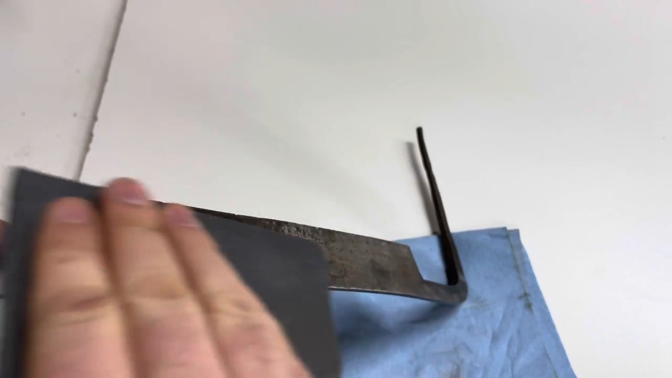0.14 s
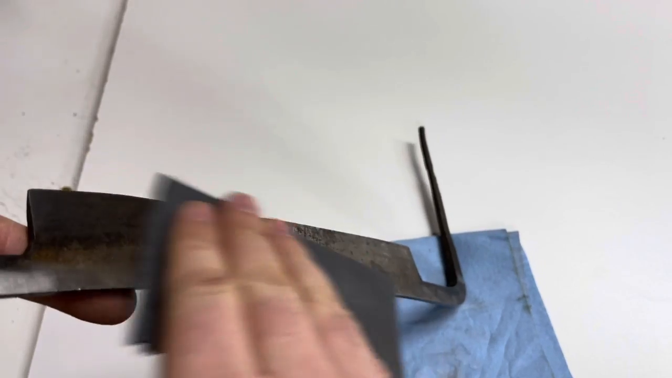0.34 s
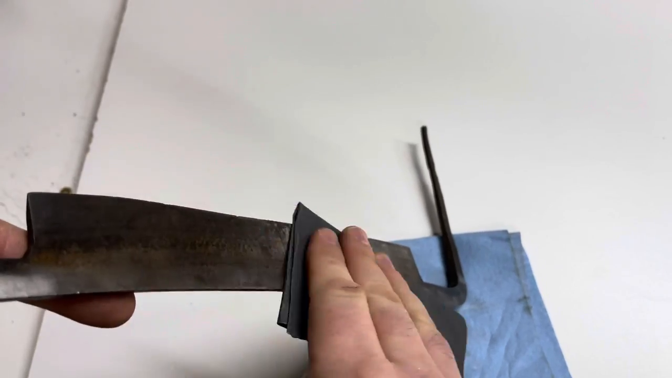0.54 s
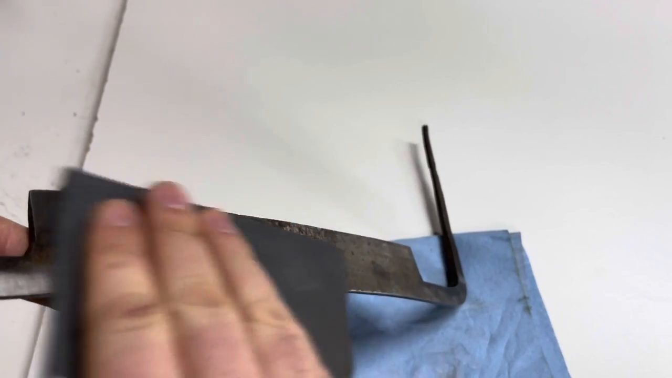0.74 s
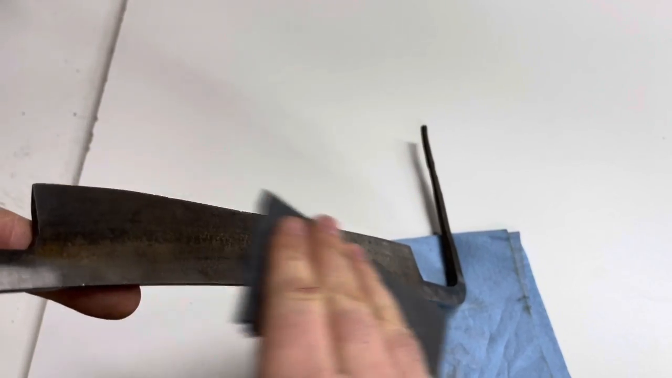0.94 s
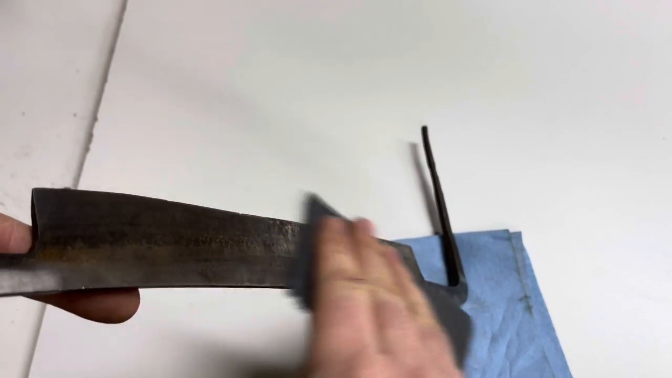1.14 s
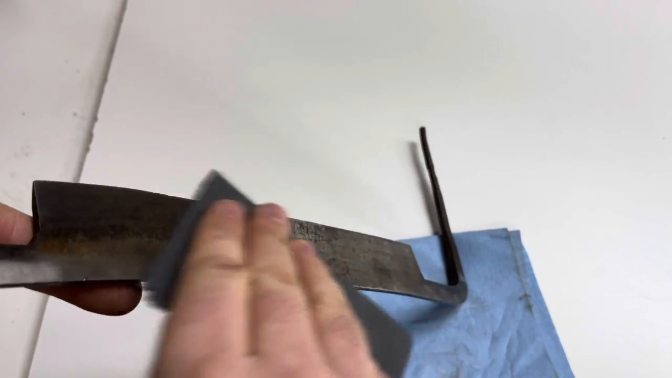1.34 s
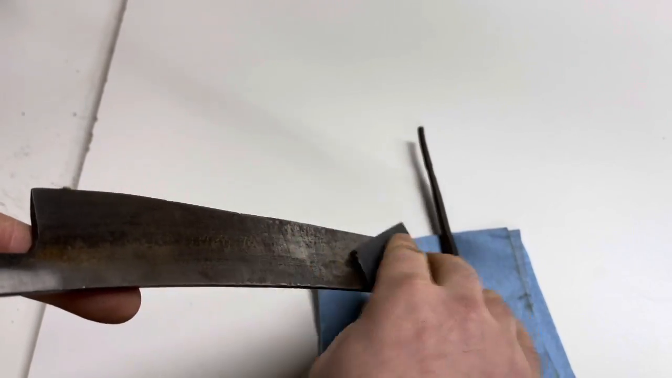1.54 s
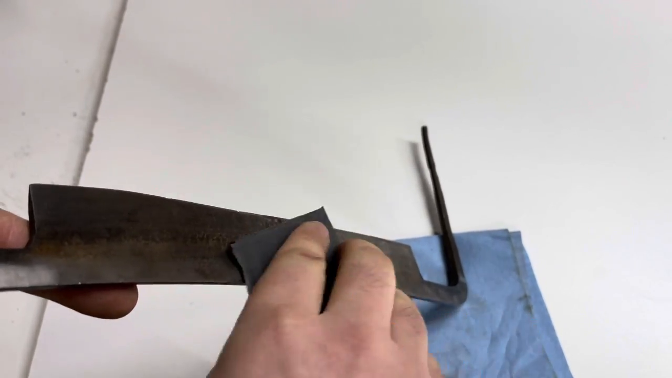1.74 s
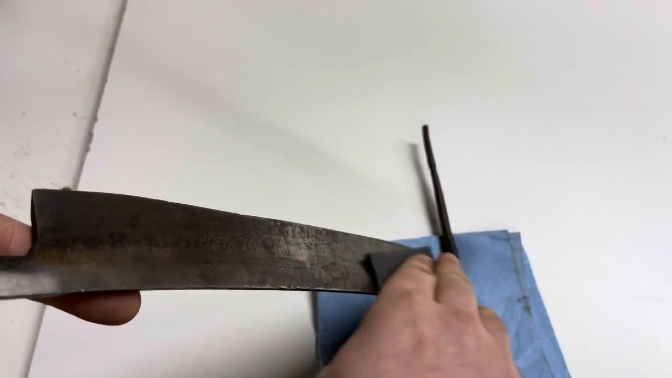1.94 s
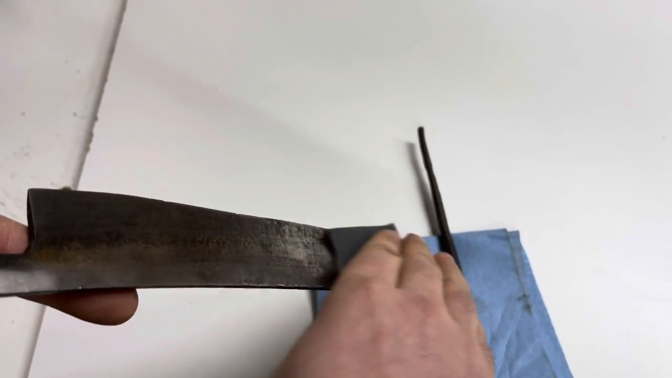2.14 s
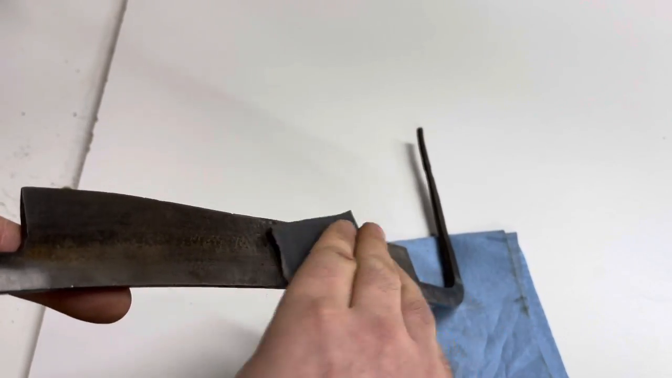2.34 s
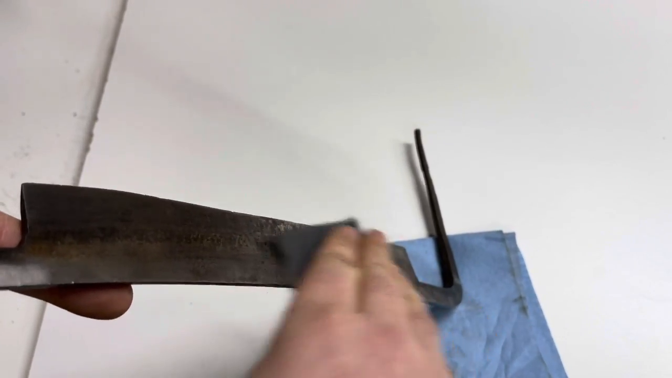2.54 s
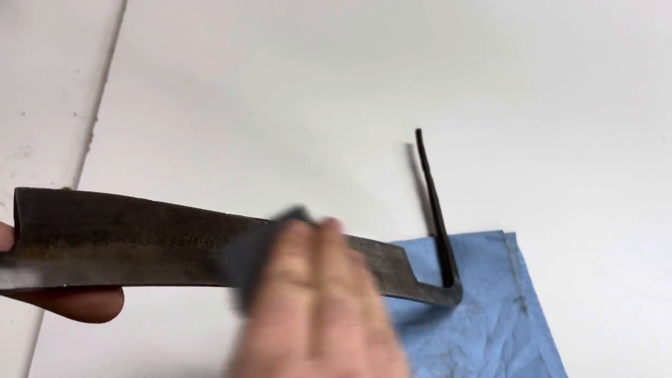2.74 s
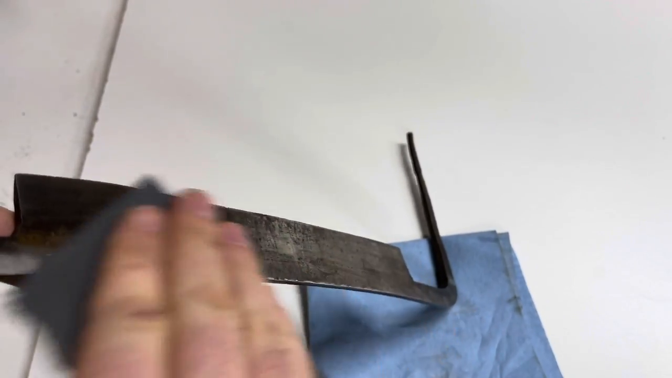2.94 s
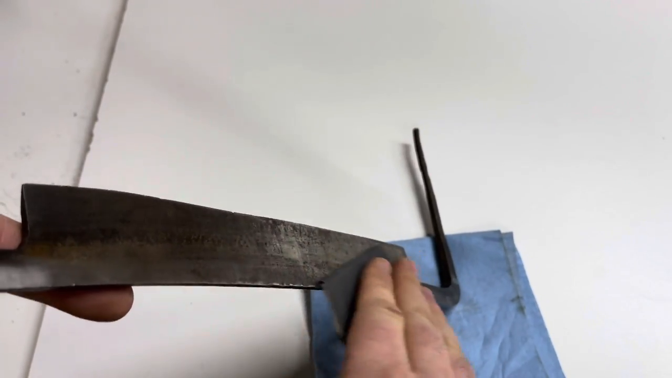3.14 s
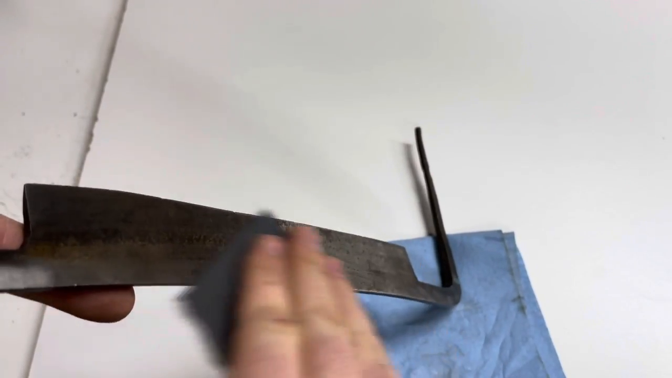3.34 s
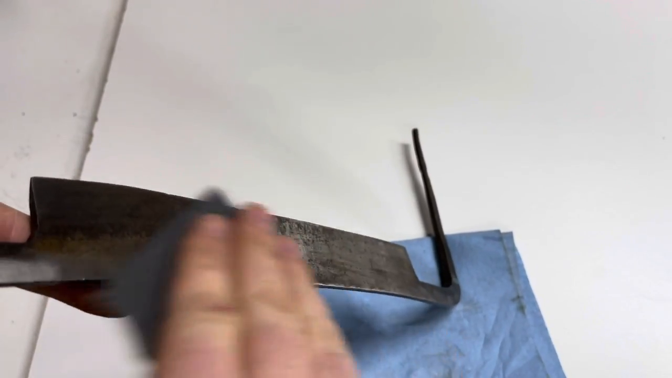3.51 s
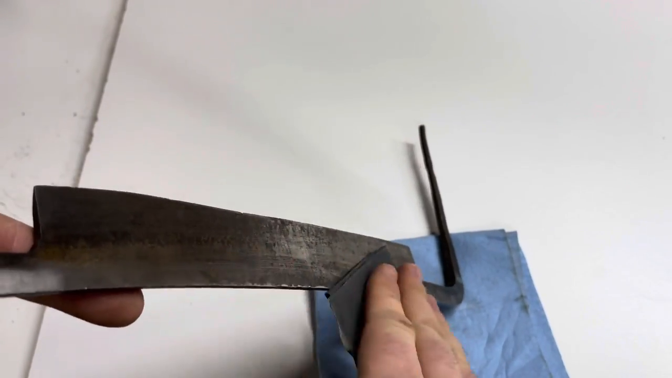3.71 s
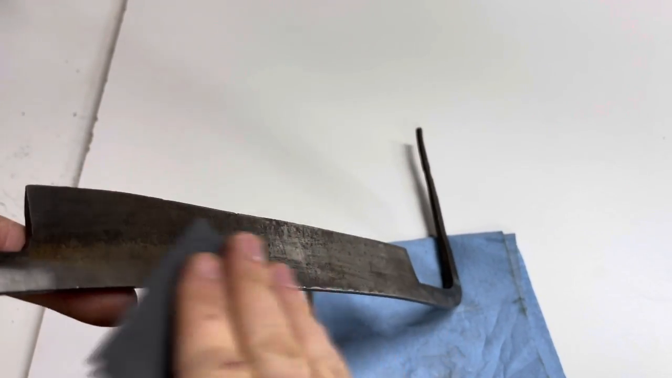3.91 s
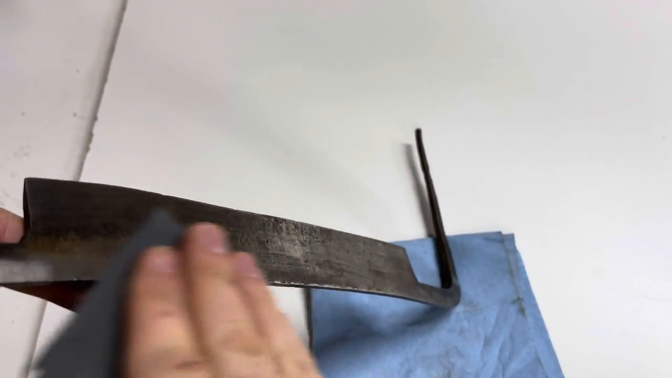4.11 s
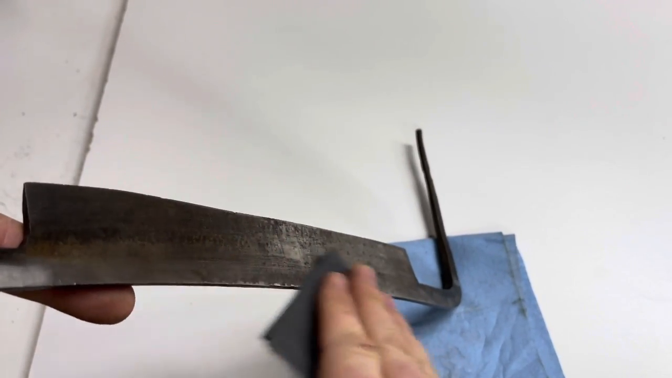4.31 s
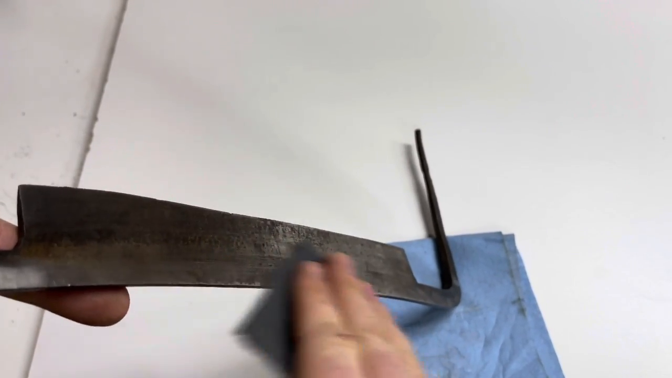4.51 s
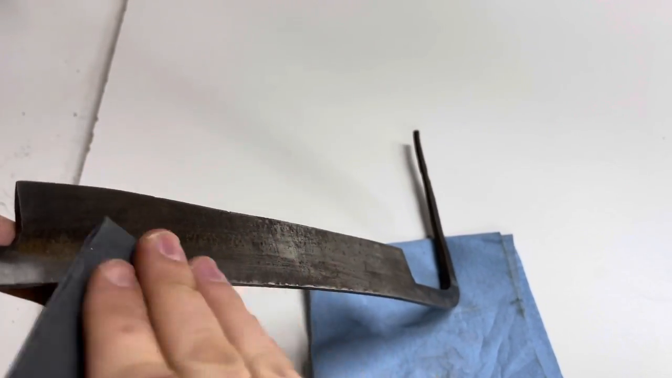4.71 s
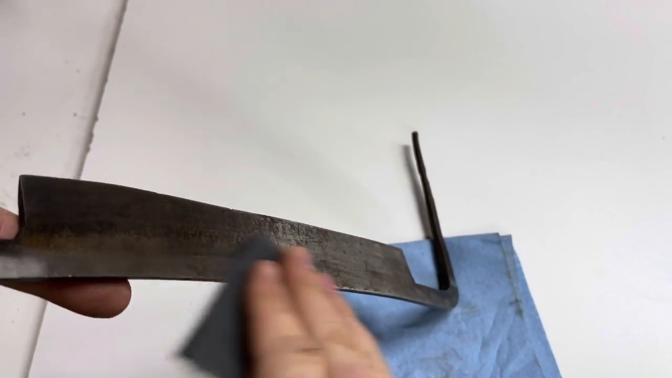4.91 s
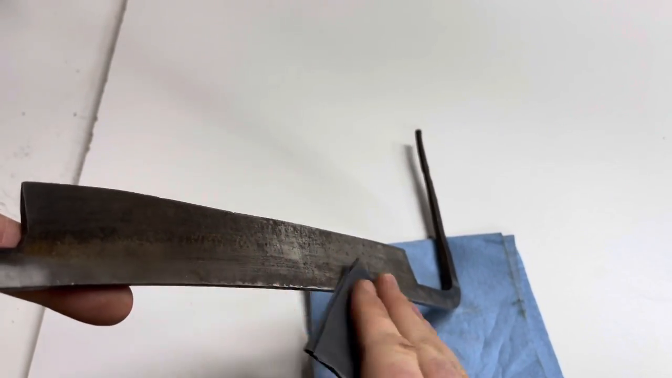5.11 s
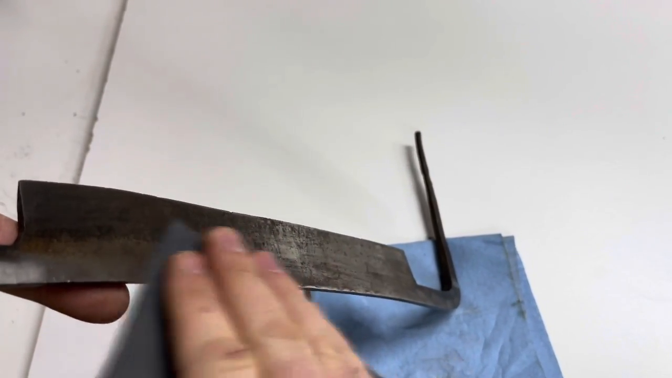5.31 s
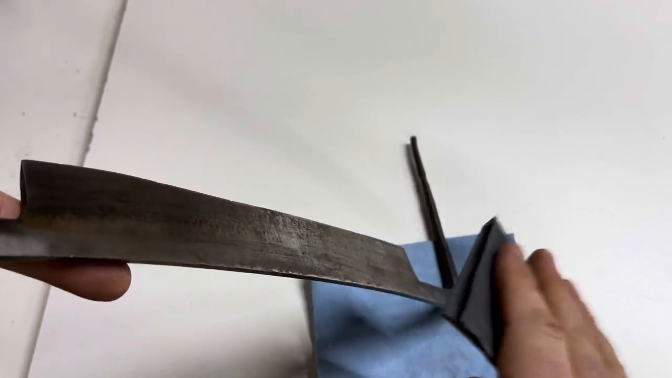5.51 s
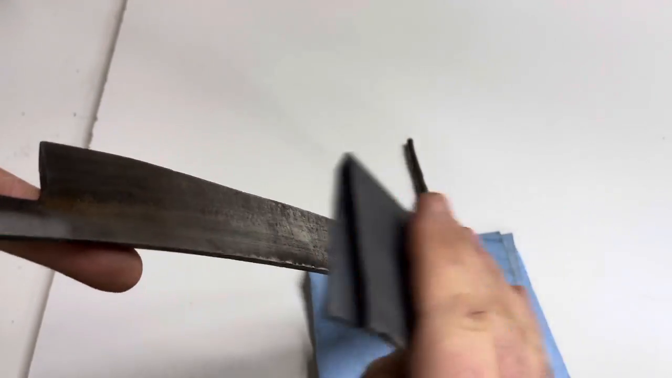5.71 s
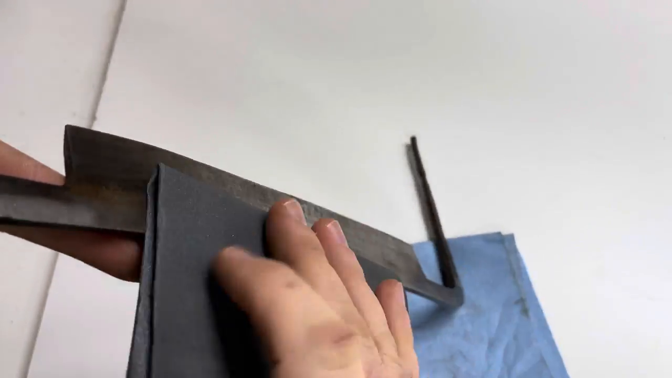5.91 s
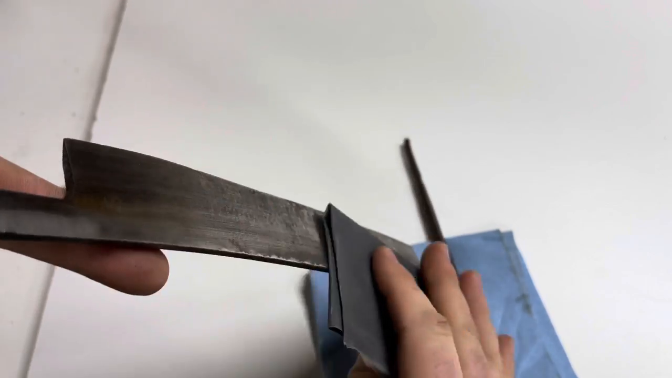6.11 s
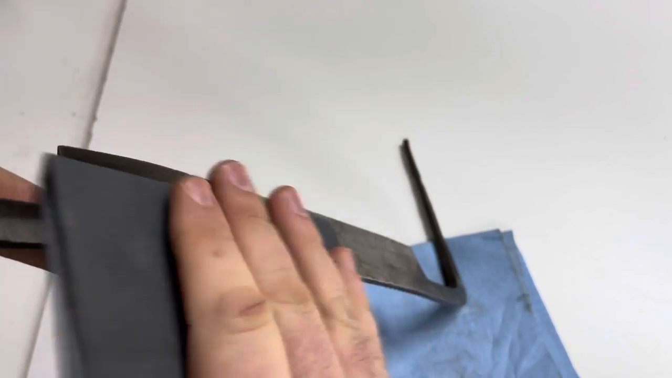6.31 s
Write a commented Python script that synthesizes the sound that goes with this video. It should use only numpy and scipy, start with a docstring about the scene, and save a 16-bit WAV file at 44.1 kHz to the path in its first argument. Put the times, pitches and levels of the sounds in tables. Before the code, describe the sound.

Fast hand sanding of steel: bright, gritty, alternating rasps with tiny gaps at each turn, heard close in stereo. Strokes begin loud, ease slightly, and continue steadily with occasional sharp scratches and low metallic flexing. After more than five seconds they stop for half a second of light brushing and thuds, then sanding resumes until the cut-off. A quiet machine hum and room air sit beneath.

```python
"""Sandpaper is rubbed to and fro along a rusty steel blade on a bench, close to a two-port microphone. From the
start a machine hums, shaped noise hisses stroke by stroke under the hand's gliding hollow resonance, noise
bursts snag, and noise through flexing modes makes the blade rumble; knocks ring the bench. At 5.45 s the paper
lifts; only light touches and knocks sound until the strokes resume at 5.97 s, the hum swelling, and run to the
end."""
import sys
import numpy as np
from scipy import signal
from scipy.fft import rfft, irfft, next_fast_len
from scipy.io import wavfile
from scipy.ndimage import uniform_filter1d, map_coordinates

SR = 44100
rng = np.random.default_rng(int(sys.argv[2]) if len(sys.argv) > 2 else 0)


def put_to_file(sound):
    """Save the sound as 16-bit audio at rate SR, in the file named by the first command-line argument."""
    columns = np.atleast_2d(sound).T  # one column per channel
    safe = np.clip(columns, -1, 1)
    whole_steps = np.round(safe * 32767)
    wavfile.write(sys.argv[1], SR, whole_steps.astype(np.int16))


N = 280035


def amp(db):
    """Gain of a level in dB."""
    return 10 ** (np.asarray(db) / 20)


def unit(x):
    """Scaled to rms 1."""
    return x / np.sqrt(np.mean(x ** 2) + 1e-20)


def at(t, curve):
    """A per-sample curve read at times t in seconds."""
    return np.interp(t, np.arange(N) / SR, curve)


def curves(rows, t=None):
    """Each column after the time, interpolated at every sample or at times t."""
    s, *cols = np.transpose(rows)
    when = np.arange(N) / SR if t is None else t
    return [np.interp(when, s, c) for c in cols]


def wobble(rate_hz):
    """A smooth random curve, rate_hz knots a second."""
    knots = rng.standard_normal(int(N * rate_hz / SR) + 4)
    return map_coordinates(knots, [np.arange(N) * rate_hz / SR])


def patches(shape, size):
    """A random field over frequency and time, smooth over size cells."""
    field = rng.standard_normal(shape)
    field = uniform_filter1d(field, size[0], axis=0)
    return unit(uniform_filter1d(field, size[1], axis=1))


def filtered(x, response):
    """x times a complex response of frequency."""
    m = next_fast_len(N + SR // 2)
    return irfft(rfft(x, m) * response(np.fft.rfftfreq(m, 1 / SR)), m)[..., :N]


def along(points, hz):
    """Each column after the frequency, interpolated on a log axis."""
    f, *v = np.transpose(points)
    return np.array([np.interp(np.log(hz + 1), np.log(f + 1), c) for c in v])


def resonance(f, hz, width_hz):
    """One causal resonance of top gain 1."""
    return 1j * f * width_hz / (hz * hz - f * f + 1j * f * width_hz)


# Each row: frequency in Hz, left-right likeness from 0 to 1.
PORT_LIKENESS = [(25, .7), (100, .85), (600, .25), (1050, .65), (1550, .6), (2200, .25), (2800, .15),
                 (4000, .3), (5000, .15), (6200, .4), (6900, .1), (8300, .55), (8750, .85), (9200, .8),
                 (10000, .99), (10400, .995), (11400, .8), (11900, .99), (12500, .97), (13200, .3),
                 (14300, .4), (15000, .99)]
# Port resonances differ. Each row: frequency in Hz, lead of the right port in rad.
RIGHT_LEAD = [(100, .3), (300, 1), (800, -1.1), (1450, -.1), (1850, 1), (2500, 3.3), (3400, 2.3),
              (4000, -1), (5200, -2.5), (6000, 0), (7100, -1.7), (8100, 0), (8750, .2), (9300, 1.4),
              (9730, 2.6), (10080, 3.05), (10330, 3.25), (10800, 4.1), (11300, 5.1), (11800, 2 * np.pi)]


def ports(pair):
    """Two unrelated signals become the partly alike left and right of the microphone."""
    m = next_fast_len(N + 8192)
    hz = np.fft.rfftfreq(m, 1 / SR)
    left, other = rfft(pair, m)
    alike = np.clip(along(PORT_LIKENESS, hz)[0], 0, 1)
    shared = alike * left * np.exp(1j * along(RIGHT_LEAD, hz)[0])
    right = shared + np.sqrt(1 - alike ** 2) * other
    return irfft(np.array([left, right]), m)[:, :N]


# Machine hum before its wavering. Each row: time in s, fundamental in dB, octave in dB.
HUM_LEVELS = [(0, -62, -69), (2.2, -60.5, -72), (2.7, -64, -72), (3.8, -57.5, -68), (5.4, -58.5, -67),
              (5.95, -52, -55.5), (6.05, -56, -47), (6.35, -55, -49)]
# Room air spectrum. Each row: frequency in Hz, relative level in dB.
AIR_SPECTRUM = [(25, -46), (45, 7), (70, 2), (200, -9), (400, -6), (1500, -23.5), (3000, -13.5),
                (8000, -41), (10400, -37), (11400, -44), (12200, -50), (16000, -58)]
HUM_HZ, HUM_WAVERS_DB = 69.8, 1.5


def workshop():
    """A wavering machine hum of three harmonics over steady room air."""
    low_db, octave_db = curves(HUM_LEVELS)
    phase = 2 * np.pi * np.cumsum(HUM_HZ + 0.46 * wobble(2.99)) / SR
    hum = amp(low_db + HUM_WAVERS_DB * wobble(2.42)) * np.sin(phase)
    hum += amp(octave_db + HUM_WAVERS_DB * wobble(2.3)) * np.sin(2 * phase)
    hum += amp(-69.5) * np.sin(3 * phase)
    air = filtered(ports(rng.standard_normal((2, N))), lambda f: amp(along(AIR_SPECTRUM, f)))
    return hum + amp(-58.0) * unit(air) * amp([[1.2], [-1.2]])  # left louder than right


# Blade or hand meeting the bench. Each row: start in s, relative thud in dB, relative click in dB.
BENCH_KNOCKS = [(0.762, -41, -51), (1.204, -54, -24), (2.082, -66, -27.5), (3.347, -48, -45),
                (3.957, -55, -47), (5.574, -51, -36), (5.812, -30.5, -36.5), (6.029, -33, -36),
                (6.17, -41, -50), (6.203, -38, -50), (6.302, -36, -31.5)]
# Bench modes. Each row: frequency in Hz, relative level in dB, t60 in s.
BENCH_MODES = [(76.4, -8, .12), (111, 4.5, 0.066), (152, 10.5, 0.042), (264, 12, 0.033), (321, 5.5, 0.06),
               (406, 0, 0.091), (540, 9, 0.03)]
KNOCK_SCATTER_DB = 2.5  # from mode to mode and knock to knock


def knocks():
    """Each knock rings the bench modes as a thud and clicks dully on the steel."""
    thud, click = np.zeros((2, N + SR)), np.zeros((2, N + SR))
    t = np.arange(SR // 4) / SR
    for s, thud_db, click_db in BENCH_KNOCKS:
        here = slice(round(s * SR), round(s * SR) + len(t))
        ring = 0
        for hz, db, t60 in BENCH_MODES:
            decay = amp(db + rng.normal(0, KNOCK_SCATTER_DB) - 60 * t / t60)
            ring = ring + decay * np.sin(2 * np.pi * hz * t)
        thud[:, here] += amp(thud_db - 7.5) * ring * (1 - np.exp(-t / 0.0048))
        click[:, here] += amp(click_db - 60 * t / 0.067) * rng.standard_normal((2, len(t)))
    return thud[:, :N] + filtered(ports(click[:, :N]), lambda f: 2 * resonance(f, 1620, 870))


# Pushes and pulls in turn, each up to the next row. Each row: start in s, relative early level in dB,
# relative late level in dB, hollow under the hand at the start in Hz.
STROKE_ROWS = [(-0.05, -26.5, -23.5, 1560), (0.127, -23.5, -23.5, 1270), (0.275, -25, -25.5, 1770),
               (0.425, -25, -23.5, 1230), (0.572, -25.5, -26, 1780), (0.715, -25, -23.5, 1290),
               (0.882, -25.5, -26.5, 1790), (1.05, -27, -23.5, 1300), (1.218, -28, -26.5, 1730),
               (1.402, -27, -30.5, 1440), (1.601, -28.5, -29, 1820), (1.767, -28.5, -30.5, 1200),
               (1.926, -28.5, -30.5, 1980), (2.07, -29.5, -26, 1200), (2.21, -27.5, -27, 1800),
               (2.337, -29, -27.5, 1440), (2.463, -29, -27.5, 1880), (2.669, -26.5, -27.5, 1110),
               (2.83, -28.5, -26.5, 1800), (2.994, -27.5, -26.5, 1100), (3.144, -26.5, -27.5, 1720),
               (3.294, -28, -27.5, 1200), (3.428, -28, -24.5, 1720), (3.579, -27, -26, 1070),
               (3.73, -27, -28, 1780), (3.878, -28.5, -28, 1290), (4.02, -24.5, -27.5, 1800),
               (4.165, -26.5, -26, 1290), (4.297, -24.5, -27.5, 1820), (4.432, -27.5, -28, 1180),
               (4.566, -26, -28, 1840), (4.724, -27.5, -27.5, 1330), (4.855, -28, -29.5, 1830),
               (5, -30, -27, 1260), (5.138, -28, -28.5, 1840), (5.283, -28.5, -30, 1160),
               (5.968, -29, -31.5, 1470), (6.127, -28.5, -24, 1850), (6.297, -27.5, -32, 3200),
               (6.42, -30, -30, 2800)]
LIFT_S, LIFTED_DB, LIFTED_HZ = 5.453, -61, 1930  # the paper comes off the blade until the next stroke


def strokes():
    """Start, early and late level, hollow, direction (0 push, 1 pull); lifted paper is a faint push."""
    rows = sorted(STROKE_ROWS + [(LIFT_S, LIFTED_DB, LIFTED_DB, LIFTED_HZ)])
    return (*np.transpose(rows), np.arange(len(rows)) % 2)


# Short surges of the rub and light touches on the blade. Each row: start in s, relative level in dB, t60 in s.
SURGES = [(1.556, -18, 0.045), (1.63, -27, .07), (5.44, -53.5, 0.52), (5.525, -39, 0.1),
          (5.545, -31.5, 0.074), (5.575, -50, 0.12), (5.676, -45, 0.037), (5.807, -27.5, 0.23),
          (5.885, -68, 0.75)]
# Flexing modes. Each row: frequency in Hz, width in Hz, relative level in dB.
BLADE_MODES = [(51.4, 57, -14), (113.8, 16, 2.5), (170, 12, -8), (237, 28, -6), (274.3, 18, -0.5)]
# Two lowest modes together, before wavering. Each row: time in s, level in dB.
RUMBLE_LEVELS = [(0, -68), (.15, -49), (.3, -59.5), (1.5, -54.5), (1.7, -65.5), (2.3, -60), (2.9, -57.5),
                 (3.1, -54), (3.75, -57), (3.9, -62), (4.25, -57), (5.4, -54), (5.55, -80), (5.8, -53.5),
                 (6.0, -59), (6.35, -65)]
# Each row: time in s, share of the pull-end swell in the middle mode, share in the top modes.
SWELL_SHARES = [(0, 0.15, 0.26), (3.2, 0.22, 0.19), (3.43, .3, 0.95), (3.73, 0.65, 0.37),
                (4.02, 0.47, 0.55), (4.3, 0.76, 0.29), (4.57, 0.99, 0.36), (4.855, 1, 0.52),
                (5.14, .2, 0.18), (5.4, 0.24, 0.31), (6.35, 0.34, 0.16)]
# upper flexing swells where a pull ends
UPPER_FLEX_DB, PULL_END_DB, PULL_END_S = -62.5, 21.5, 0.048
FLEX_WAVERS_DB = 2


def blade():
    """The rubbing shakes the blade's slow flexing modes: noise through resonances."""
    def flexing(noise, modes):
        return filtered(ports(noise), lambda f: sum(amp(db) * resonance(f, c, w) for c, w, db in modes))

    low_db, = curves(RUMBLE_LEVELS)
    shares = np.array(curves(SWELL_SHARES))
    s, *_, pull = strokes()
    t = np.arange(N) / SR
    swell = sum(np.exp(-((t - end + 0.02) / PULL_END_S) ** 2) for end in s[pull == 0])
    touching = (t < LIFT_S) | (t > SURGES[7][0])
    lifted_db = -20 * (1 - uniform_filter1d(touching * 1., size=2000))
    upper_db = UPPER_FLEX_DB + PULL_END_DB * shares * swell + FLEX_WAVERS_DB * wobble(8) + lifted_db
    shake = rng.standard_normal((3, 2, N))
    # the second mode keeps ringing between the shakes, its pitch bending with the grip
    bent_hz = BLADE_MODES[1][0] + 2.53 * wobble(6.4)
    ringing = amp(0.5) * np.sin(2 * np.pi * np.cumsum(bent_hz) / SR)
    low = unit(flexing(shake[0], BLADE_MODES[:2])) + ringing
    middle = flexing(shake[1], BLADE_MODES[2:3])
    top = flexing(shake[2], BLADE_MODES[3:])
    out = amp(low_db + FLEX_WAVERS_DB * wobble(5.5)) * unit(low)
    out = out + amp(upper_db[0] + BLADE_MODES[2][2]) * unit(middle)
    return out + amp(upper_db[1]) * unit(top)


# Grit catching on rust. Each row: start in s, relative level in dB, colour in Hz, t60 in s.
GRIT_SNAGS = [(0.147, -27, 10000, 0.038), (0.441, -16, 10000, 0.033), (0.821, -13.5, 4730, 0.035),
              (1.627, -28, 5800, 0.018), (2.245, -16, 4900, 0.024), (2.344, -22, 9000, 0.012),
              (2.406, -15.5, 10600, 0.09), (2.418, -10, 3000, 0.021), (2.425, -16, 4400, 0.11),
              (2.514, -19, 4500, 0.059), (2.877, -17, 9000, 0.014), (2.899, -21, 5000, .02),
              (2.926, -11.5, 9150, 0.026), (2.933, -12, 1330, 0.051), (3.232, -16, 2820, 0.03),
              (3.31, -19, 9000, .015), (3.923, -19.5, 4000, 0.027), (3.955, -17.5, 5000, 0.022),
              (4.081, -14, 5000, 0.035), (4.092, -14.5, 3600, 0.041), (4.181, -5, 9300, 0.0073),
              (4.313, -27, 1760, .02), (4.6, -26, 4900, .02), (4.735, -19.5, 3700, 0.057),
              (5.404, -17.5, 4620, 0.029), (5.8, -24, 3320, 0.031), (5.9, -38, 5000, .02),
              (5.978, -27.5, 4100, 0.028), (6.247, -16.5, 5560, 0.024), (6.258, -15, 4900, .015),
              (6.277, -16, 3300, 0.017)]
SNAG_WIDTH = 0.33  # width of the colour over its centre


def snags():
    """Each snag is a short noise burst with its own broad resonance."""
    out, t = np.zeros((2, N + SR)), np.arange(4096) / SR
    f = np.fft.rfftfreq(len(t), 1 / SR)
    for s, db, hz, t60 in GRIT_SNAGS:
        envelope = amp(db + 4 - 60 * t / t60) * (1 - np.exp(-t / 0.00073))
        burst = envelope * rng.standard_normal((2, len(t)))
        coloured = irfft(rfft(burst) * resonance(f, hz, SNAG_WIDTH * hz))
        out[:, round(s * SR):][:, :len(t)] += coloured
    return out[:, :N]


# How far the rub sinks under the strokes on either side: before a push in dB, before a pull in dB.
TURN_SINK_DB = [-12.5, -15]


def stroke_level(start_s, stop_s):
    """The paper jerks off from each turn, runs and slows to the next: gain and speed."""
    s, early, late, _, pull = strokes()
    turn_db = (early + np.roll(late, 1)) / 2 + np.take(TURN_SINK_DB, pull)
    t = np.arange(N) / SR
    k = np.searchsorted(s, t, side="right") - 1
    progress = (t - s[k]) / (s[k + 1] - s[k])
    run = amp(early[k] + (late[k] - early[k]) * np.clip((progress - .3) / 0.42, -.3, 1.3))
    speed = np.tanh((t - s[k]) / start_s) * np.tanh((s[k + 1] - t) / stop_s)
    return amp(np.interp(t, s, turn_db)) * (1 - speed) + run * speed, speed


# Hold of the hand. Each row: time in s, relative sizzle in dB, relative hollow in dB,
# leak below the hollow in dB, flatness of the hand (ratio).
HAND_GRIP = [(0, 3.5, -21, -9.5, 0.99), (.9, 4, -27, -5.5, 1.2), (1.3, 2, -51, -6.5, 0.74),
             (1.5, 2, -7, -5.5, 0.66), (1.75, 2, -9.5, -10.5, .4), (1.9, 0.5, -12.5, -10, 0.78),
             (2.3, 3, -9, -9.5, 0.41), (2.75, 7, -12, -7, 0.33), (3.1, 5.5, -15.5, -8.5, 0.16),
             (3.9, 3, -15, -6.5, 0), (4.3, 2, -18, -7.5, 0), (4.8, 2.5, -14.5, -6.5, 0.36),
             (5.35, 5, -21, -11.5, 0), (5.6, -7.5, -8, -1, .3), (6.0, 1.5, -19, 3, 0.32),
             (6.1, 2, -12, 12, 1.4), (6.2, 3.5, -31, -4, 0.31), (6.35, 7.5, -18, 1, 2.2)]
BITE_S, FADE_S = 0.027, 0.035  # the sizzle bites at once and fades as the stroke slows
PULL_SIZZLE_DB = 2  # a pull against a push
HOLLOW_AHEAD_S = 0.0061  # the hollow turns a little before the paper does
# the fingers never hold still; shake and width over centre
HOLLOW_SHAKE, HOLLOW_FLICKER_DB, HOLLOW_WIDTH = .035, 3, .18
# brief wandering dips above the hollow; width in log frequency, dB per unit of random depth
DIP_HZ, DIP_WIDTH, DIP_DB = 2280, 0.061, -7.5


def colour(hz, t, speed):
    """Gain over frequency and time: speed brightens the grit, the hand's hollow glides with each stroke."""
    s, _, _, turn_hz, pull = strokes()
    middle_s = np.append((s[1:] + s[:-1]) / 2, s[-1])
    pulling = np.interp(t, middle_s, pull) - .5
    sizzle_db, hollow_db, leak_db, _ = curves(HAND_GRIP, t)
    sizzle_db = sizzle_db + PULL_SIZZLE_DB * pulling
    # the hand lingers at each end of its travel
    travel = np.interp(t + HOLLOW_AHEAD_S, s, np.arange(len(s)))
    travel = travel - np.sin(2 * np.pi * travel) / (4 * np.pi)
    centre_hz = np.interp(travel, np.arange(len(s)), turn_hz) * (1 + HOLLOW_SHAKE * at(t, wobble(30)))
    hollow_db = hollow_db + HOLLOW_FLICKER_DB * at(t, wobble(22.0))
    bite = at(t, stroke_level(BITE_S, FADE_S)[1])
    treble_db = (sizzle_db + 5.0 - 6 * (1 - bite)) / (1 + (8000 / hz) ** 8)
    # little escapes below the hollow's resonance while the hand seals it
    leak = np.minimum(amp(leak_db), 1)
    below = leak + (1 - leak) / np.sqrt(1 + (.87 * centre_hz / hz) ** 16)
    peak = np.abs(resonance(hz, centre_hz, HOLLOW_WIDTH * centre_hz)) ** 2
    hollow = below + amp(hollow_db + 18.5 + 0.78 * (2.0 - speed)) * peak
    # the body of the rasp carries on through each turn
    carry_db = 5 * (1 - speed) / (1 + (hz / 5000) ** 2)
    depth, drift = at(t, wobble(24)), at(t, wobble(12))
    notch = np.exp(-((np.log(hz / DIP_HZ) + 0.057 * drift) / DIP_WIDTH) ** 2)
    dip_db = DIP_DB * np.clip(depth + 0.21, 0, 1.3) * notch
    return amp(treble_db + dip_db + carry_db) * hollow


# Shading by a flat hand at flatness 1. Each row: frequency in Hz, left in dB, right in dB.
FLAT_SHADING = [(1200, 0, -1), (1630, -3.5, -5.5), (2090, 6, 7.5), (2580, 2, 2), (3110, 5, 4.5),
                (3600, -1, -3), (4000, -8.5, -2.5), (4400, -0.5, -0.8), (5000, 0.5, 0.5)]
FLAT_SWING = 0.66  # the hand lies flatter at the far end of its travel
FLAT_SHAKE = .075  # its bands slide as the hand moves


def shaded(pair):
    """The flatter the hand, the more its shading colours each port."""
    hz, t, z = signal.stft(pair, SR, nperseg=512)
    slide = 1 + FLAT_SHAKE * at(t, wobble(14))
    s, *_, pull = strokes()
    flat = curves(HAND_GRIP, t)[3] + FLAT_SWING * (np.interp(t, s, pull) - .5)
    gain = amp(flat * along(FLAT_SHADING, hz[:, None] * slide))
    return signal.istft(z * gain, SR, nperseg=512)[1][:, :N]


# The rub at each port. Each row: frequency in Hz, relative left in dB, relative right in dB.
GRIT_SPECTRUM = [(100, -11.5, -14.5), (664, -11.5, -12.5), (1310, -9, -11.5), (1750, -9.5, -8.5),
                 (2190, -8.5, -8.5), (2750, -5, -7.5), (3200, -3, -8.5), (3830, -2.5, -3.5),
                 (4250, -1, -2.5), (4780, 3.5, -3.5), (5400, -1, -7), (6370, -1, -4.5), (6860, -5.5, -7.5),
                 (7200, -3.5, -6), (9780, -12, -12), (17100, -19, -19.5)]
# Resonance of the microphone ports. Each row: frequency in Hz, relative gain in dB.
PORT_RESONANCE = [(8500, 0), (9000, 6), (10000, 11.5), (10700, 14), (11200, 11), (12000, 4.5), (13000, -5),
                  (13600, -18.5), (16000, -12.5)]


def rub():
    """Countless grit contacts, as noise, come in clumps, with single hard snags among them."""
    clumps = amp(1.2 * wobble(30) + 0.7 * wobble(220) + 0.76 * wobble(1100))
    level, speed = stroke_level(start_s=0.046, stop_s=0.039)
    # now and then one coarse grain digs in
    coarse = 1 + 0.72 * np.maximum(wobble(500) - 1.6, 0) + 0.29 * np.maximum(wobble(90) - 1.4, 0)
    level = level * unit(clumps * coarse)
    t = np.arange(SR // 3) / SR
    for s, db, t60 in SURGES:
        level[round(s * SR):][:len(t)] += amp(db - 60 * t / t60) * (1 - np.exp(-t / 0.0066))
    hz, t, z = signal.stft(level * rng.standard_normal((2, N)), SR, nperseg=512)
    hz = hz[:, None] + 1  # clear of zero
    gain = colour(hz, t, at(t, speed))
    # the contact patch keeps changing, so the colour shifts in patches, least under the hand's hollow
    shift_db = 1.78 * patches(gain.shape, size=(7, 4)) + 2.27 * patches(gain.shape, size=(2, 7))
    shift_db = shift_db / np.sqrt(1 + (1700 / hz) ** 4)
    grit = signal.istft(z * gain * amp(shift_db), SR, nperseg=512)[1][:, :N]
    heard = shaded(ports(grit + snags()))
    return filtered(heard, lambda f: amp(along(GRIT_SPECTRUM, f) + along(PORT_RESONANCE, f) + 4.5))


def scene():
    """All sources together."""
    return workshop() + knocks() + blade() + rub()


TOP_HZ = 15800


def record(dry):
    """The microphone keeps nothing above its band limit."""
    return filtered(dry, lambda hz: hz < TOP_HZ)


dry = scene()
out = record(dry)
put_to_file(out)
```